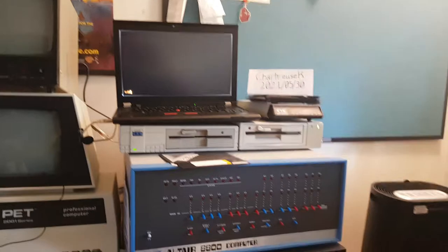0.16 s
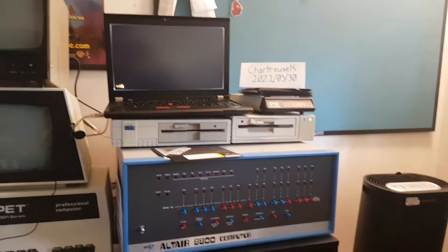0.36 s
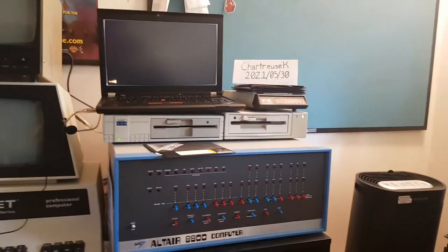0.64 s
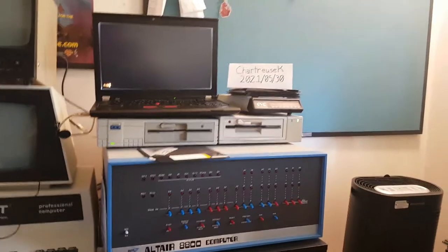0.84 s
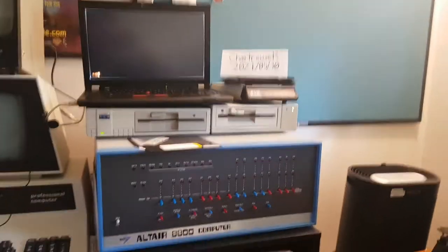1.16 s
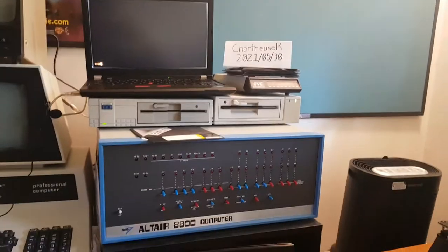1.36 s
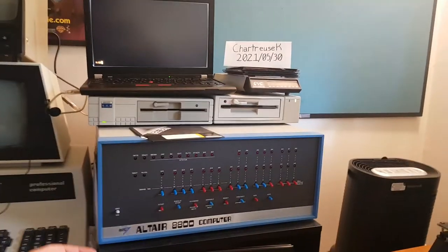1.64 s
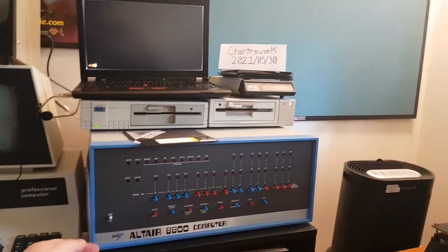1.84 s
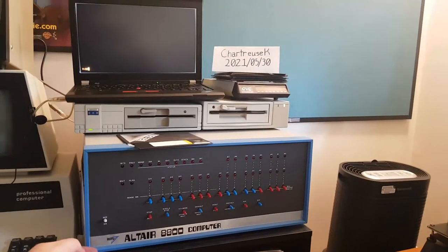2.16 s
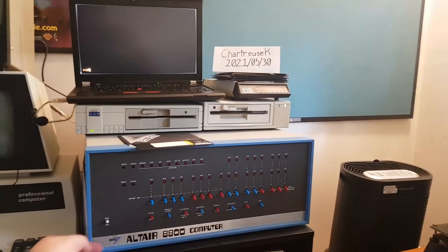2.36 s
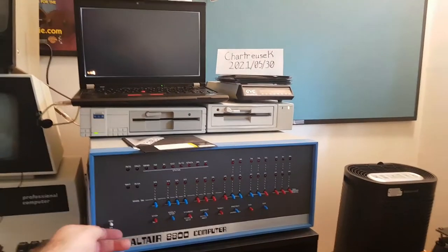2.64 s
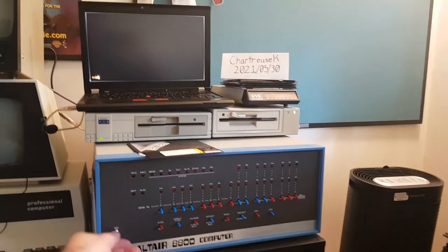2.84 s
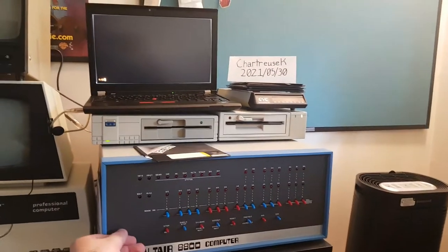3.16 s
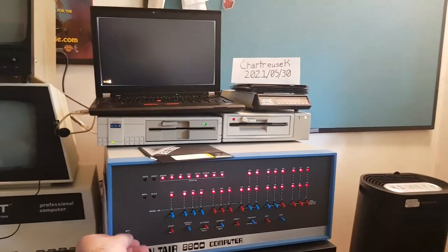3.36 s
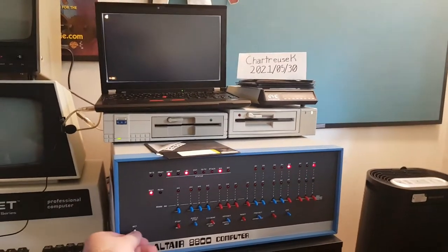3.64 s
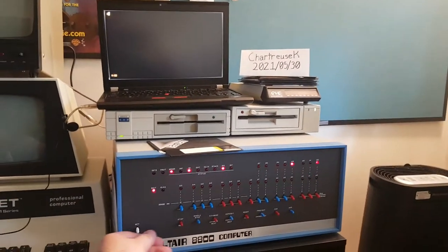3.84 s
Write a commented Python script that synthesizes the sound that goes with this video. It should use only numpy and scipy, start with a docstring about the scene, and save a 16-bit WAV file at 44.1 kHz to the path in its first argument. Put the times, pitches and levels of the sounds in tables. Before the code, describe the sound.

One crisp switch click with brief panel rattle and short room echo, after over three seconds; steady low fan hum and airy rush fade in first and continue unchanged, heard from a short distance on one channel.

```python
"""First the sound fades in: two fans of nearly equal speed hum and beat slowly over a steady rush of air.
The hum is made of sine tones, the rush of coloured noise. Hand and sleeve brush by faintly (swishes of noise).
Then a toggle switch on the metal front panel of an old computer is snapped on in a small room:
short noise bursts make its lever and spring ring, knocks make the panel ring, and the room echoes both."""
import sys
import numpy as np
from scipy import signal
from scipy.io import wavfile
from scipy.ndimage import uniform_filter1d

SR = 44100
rng = np.random.default_rng(int(sys.argv[2]) if len(sys.argv) > 2 else 0)


def gain_from_decibels(decibels):
    """Convert decibel values to linear amplitude factors."""
    exponent = np.asarray(decibels, float) / 20
    return 10 ** exponent


def store_pcm(level_fs):
    """Save levels as 16-bit WAV."""
    pcm = np.round(np.clip(level_fs, -1, 1) * 32767).astype(np.int16)
    wavfile.write(sys.argv[1], SR, np.atleast_2d(pcm).T)


N = 176400  # samples, 4 s

# contacts of the lever, as noise bursts: start_s, relative level_db, length_s
SNAPS = [(3.4212, -46, .003), (3.4253, -31, .001), (3.4261, -19, .0004), (3.4271, -21, .0004),
         (3.4282, -22, .0006), (3.4296, -24, .0006), (3.4328, -28, .0008), (3.435, -31, .003),
         (3.4398, -35, .001), (3.448, -39, .001)]
# lever and spring of the switch: pitch_hz, relative level_db, t60_s (time to fall 60 dB, capped in switch)
LEVER = [(3500, -9.5, .006), (5460, -15, 0.0039), (5950, -4, 0.012), (6670, -4.5, 0.02), (7030, 1.5, 0.007),
         (7570, -5.5, .008), (8580, -10, .008), (9070, 4, 0.01), (9500, -2, 0.0063), (10050, -5.5, 0.0056),
         (10660, -10, .006), (11400, -15, 0.0052), (14300, -20, .006), (15200, -15.5, .006)]
# knocks into the panel: start_s, relative level_db, brightness_hz
KNOCKS = [(3.4355, -46, 7000), (3.4398, -28.5, 3500), (3.4433, -29.5, 3500), (3.449, -37.5, 2000),
          (3.456, -28, 600), (3.467, -31.5, 700)]
# ringing tones of the front panel: pitch_hz, relative level_db, t60_s (capped in switch)
PANEL = [(255, -10.5, 0.039), (490, -2.5, 0.028), (829, 0.5, 0.022), (1016, 3, 0.024), (1470, -6.5, 0.026),
         (2035, -3.5, 0.023), (2290, 3, 0.013), (2640, 3, 0.024), (3100, -8.5, 0.023), (4103, 7.5, .03),
         (4480, -7.5, .015)]
# how long the room echoes: pitch_hz, t60_s
ROOM_DECAY = [(500, 0.14), (2000, 0.16), (4000, 0.11), (6500, 0.17), (8000, 0.13), (9400, 0.22),
              (11000, 0.14), (13000, .12), (15000, .1)]
# how strong the echoes start: pitch_hz, relative level_db
ROOM_COLOUR = [(500, 10.5), (3500, 1), (5700, 1), (6600, 1), (8000, -5), (8700, 2), (9060, -12), (9800, 1),
               (11000, -1), (13000, -5)]
# blade tones of the first fan: multiple of the blade pitch, level_db (rms)
BLADE = [(1, -52), (4, -64), (5, -57.5), (10, -72.5), (11, -66.5), (12, -68.5)]
# rush of air as the room and casings colour it: pitch_hz, relative level_db (per Hz)
AIR = [(12, -42), (30, -35.5), (81, -17), (150, -16), (319, -7.5), (390, 2), (414, -13.5), (468, 4),
       (513, -14), (600, -16), (680, -21.5), (715, -12), (750, -17), (825, -8), (980, -20), (1035, -16.5),
       (1150, -28.5), (1230, -21), (1450, -26), (1700, -23), (2000, -31.5), (2130, -26.5), (2300, -33),
       (2490, -33.5), (2900, -37.5), (3300, -30.5), (3700, -34.5), (4060, -43), (4610, -41), (4800, -45),
       (5100, -40.5), (5350, -42), (5680, -36.5), (6200, -42.5), (6600, -46.5), (7280, -46), (7900, -49),
       (8300, -52.5), (11000, -55.5), (16000, -61)]
# faint brushes of hand and sleeve: start_s, length_s, centre_hz, width_hz, level_db (noise rms before shaping)
RUSTLES = [(1.058, .04, 3000, 4500, -63), (2.68, .19, 9500, 3000, -80), (3.321, 0.0089, 8000, 6000, -65)]


def evened(x):
    """Scales a signal to rms 1."""
    return x / np.sqrt(np.mean(x ** 2) + 1e-20)


def read(points, hz):
    """Reads a table between its points, on a log-frequency axis."""
    table_hz, value = np.transpose(points)
    return np.interp(np.log(hz + 1), np.log(table_hz + 1), value)


def slow_drift(t, lo_hz, hi_hz):
    """Slow random drift of rms 1: sines of random phase, the slower ones stronger."""
    drift = 0
    for hz in np.geomspace(lo_hz, hi_hz, 20):
        drift = drift + np.sin(2 * np.pi * (hz * t + rng.random())) / np.sqrt(hz)
    return evened(drift)


def ring(modes, longest_s):
    """A struck object rings in several dying tones, rising softly and pushing no steady air."""
    t = np.arange(SR // 5) / SR
    tones = 0
    for hz, db, t60 in modes:
        tones = tones + gain_from_decibels(db - 60 * t / min(t60, longest_s)) * np.sin(2 * np.pi * hz * t)
    soft_start = 1 - np.exp(-t / 0.0001)  # time constant 0.1 ms
    no_steady_push = signal.butter(2, 0.9 * modes[0][0], "high", fs=SR, output="sos")
    return signal.sosfilt(no_steady_push, tones * soft_start)


def switch():
    """The lever chatters over its spring, then knocks against the panel; each blow makes its object ring."""
    count = 400  # samples of room for each blow
    chatter, knocking = np.zeros(N), np.zeros(N)
    for start, db, length in SNAPS:
        burst = rng.standard_normal(count) * np.clip(length * SR - np.arange(count), 0, 1)
        chatter[round(start * SR):][:count] += gain_from_decibels(db) * burst / np.linalg.norm(burst)  # equal energy
    t = np.arange(count) / SR
    for start, db, brightness_hz in KNOCKS:
        push = t * np.exp(-2 * np.pi * brightness_hz * t)
        knocking[round(start * SR):][:count] += gain_from_decibels(db) * push / push.sum()
    lever = signal.oaconvolve(chatter, ring(LEVER, longest_s=0.012))[:N]
    panel = signal.oaconvolve(knocking, ring(PANEL, longest_s=0.035))[:N]
    return lever + panel


def room(x):
    """Walls return sparse echoes of random sign, each band dying at its own speed."""
    gap_s, spacing = 0.005, 20  # silence before the echoes; one echo per 20 samples
    echoes = np.zeros(SR // 2)
    slots = np.arange(0, len(echoes) - spacing, spacing)
    places = slots + rng.integers(0, spacing, len(slots))
    echoes[places] = rng.choice([-1., 1.], len(slots))
    echoes *= np.arange(len(echoes)) > gap_s * SR
    hz, t, spectrum = signal.stft(echoes, SR, nperseg=256)
    fading_db = read(ROOM_COLOUR, hz)[:, None] - 60 * t / read(ROOM_DECAY, hz)[:, None]
    tail = signal.istft(spectrum * gain_from_decibels(fading_db), SR, nperseg=256)[1]
    return signal.fftconvolve(x, tail / np.linalg.norm(tail))[:N]


def fans():
    """Passing blades hum at multiples of one pitch; a second fan's close tone beats with the lowest."""
    blade_hz, other_hz, other_db = 115.25, 117.45, -57.5
    waver_hz = 0.22  # rms pitch drift of the lowest tones
    t = np.arange(N) / SR - 3.6  # at 3.6 s the two lowest tones pull against each other: a dip in the beat
    wander = np.cumsum(waver_hz * slow_drift(t, 2, 15.58)) / SR
    first = 0
    for multiple, db in BLADE:
        first = first + gain_from_decibels(db) * np.sin(2 * np.pi * multiple * (blade_hz * t + wander))
    second = gain_from_decibels(other_db) * np.sin(2 * np.pi * (other_hz * t + wander))
    return np.sqrt(2) * (first - second)  # sqrt(2) turns the levels into rms


def air():
    """Moving air rushes as noise, coloured by the table, with faint patches and swell."""
    level_db, swell_db, patch_db = -39, 0.35, 0.6
    frames, hz = N // 1024 + 5, np.fft.rfftfreq(4096, 1 / SR)
    real, imaginary, patches = rng.standard_normal((3, len(hz), frames))
    patches = uniform_filter1d(patches, size=40, axis=0)  # smooth across pitch
    patches = evened(uniform_filter1d(patches, size=4, axis=1))  # smooth across time
    colour_db = read(AIR, hz)[:, None] + patch_db * patches
    spectrum = (real + 1j * imaginary) * gain_from_decibels(colour_db)
    rush = evened(signal.istft(spectrum, nperseg=4096, noverlap=3072)[1][:N])
    swell = slow_drift(np.arange(N) / SR, 0.452, 30)
    return rush * gain_from_decibels(level_db + swell_db * swell)


def rustle(start, length, hz, width, db):
    """A hand or sleeve brushing by: a band of noise that rises and falls once."""
    progress = np.clip((np.arange(N) / SR - start) / length, 0, 1)
    shape = np.sqrt(np.abs(np.sin(np.pi * progress))) * (progress < 1)
    edges_hz = [max(hz - width / 2, 200), hz + width / 2]
    band = signal.butter(2, edges_hz, "band", fs=SR, output="sos")
    swish = evened(signal.sosfilt(band, rng.standard_normal(N)))
    return gain_from_decibels(db) * shape * swish


def scene():
    """Mixes the switch and its echoes with the fans, the air and the brushes."""
    click = switch()
    echo = gain_from_decibels(-13) * room(click)
    rustles = sum(rustle(*row) for row in RUSTLES)
    mix = click + echo + fans() + air() + rustles
    return mix[None]  # one channel


def top_cut(x):
    """Nothing passes above the cut-off."""
    return signal.sosfilt(signal.butter(12, 16170, fs=SR, output="sos"), x)


def record(dry):
    """Adds the recorder's small constant offset, cuts the highest treble and fades in evenly."""
    offset, treble_edge_hz = -0.00044, 15700
    fade_start_s, fade_s = 0.41, 0.35
    treble_cut = signal.firwin(2047, treble_edge_hz, window=("kaiser", 9), fs=SR)
    limited = signal.oaconvolve(dry + offset, treble_cut[None], "same")
    fade = np.clip((np.arange(N) / SR - fade_start_s) / fade_s, 0, 1)
    return top_cut(limited * fade)


dry = scene()
out = record(dry)
store_pcm(out)
```